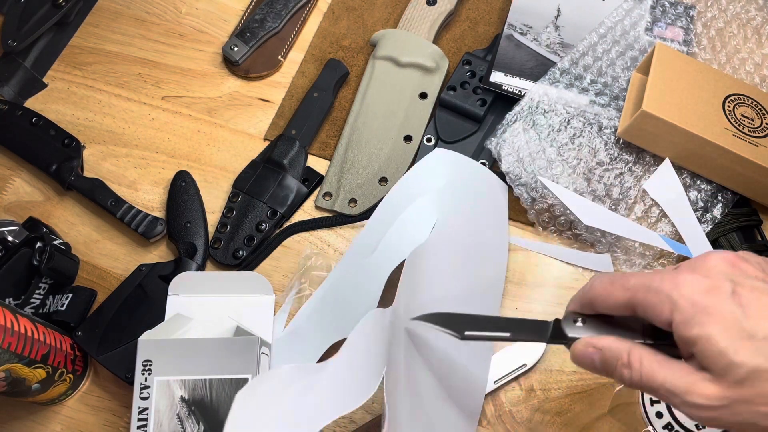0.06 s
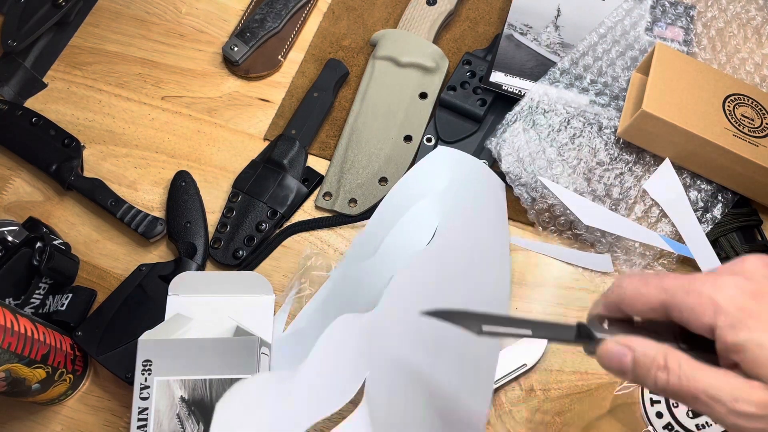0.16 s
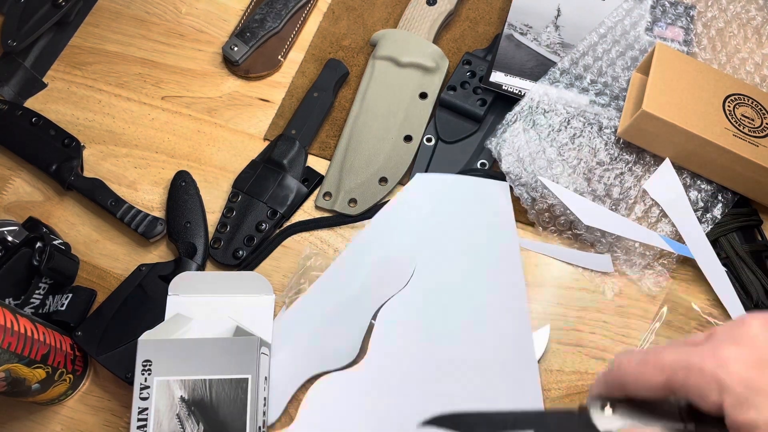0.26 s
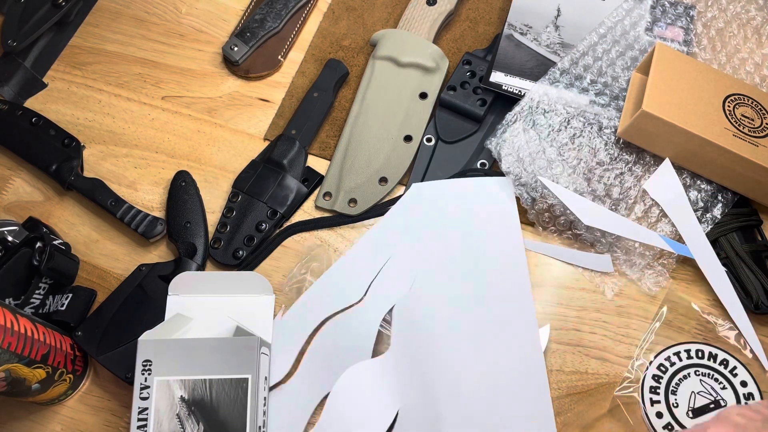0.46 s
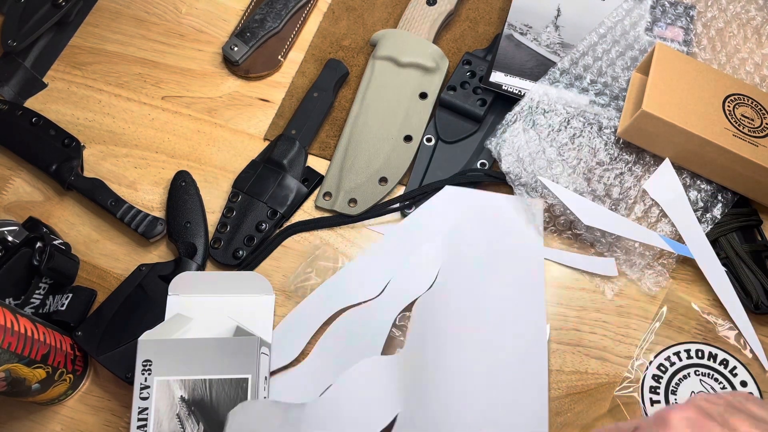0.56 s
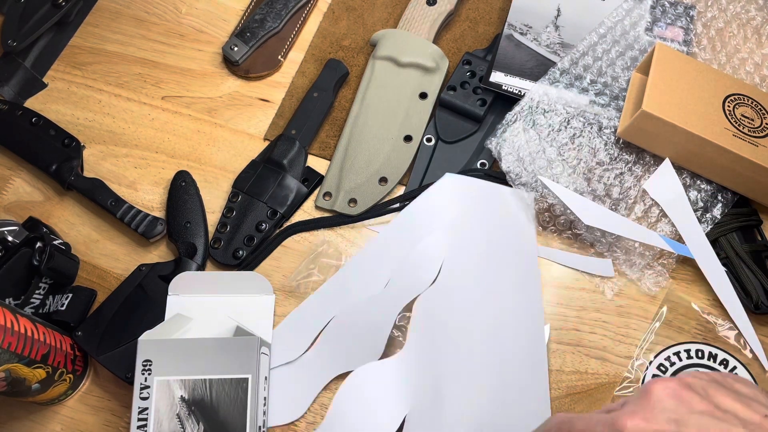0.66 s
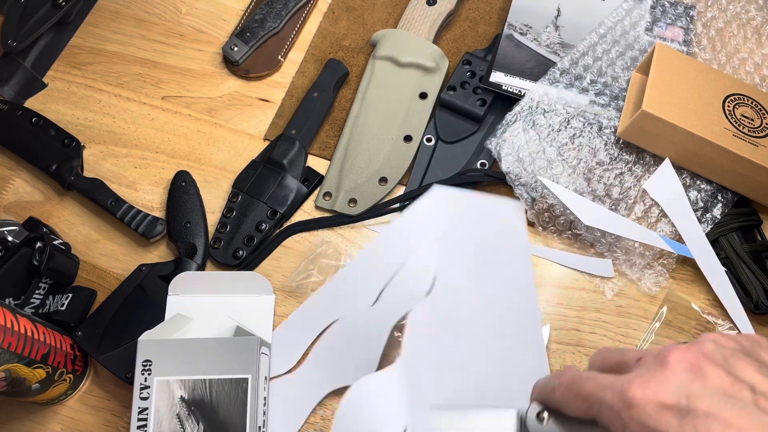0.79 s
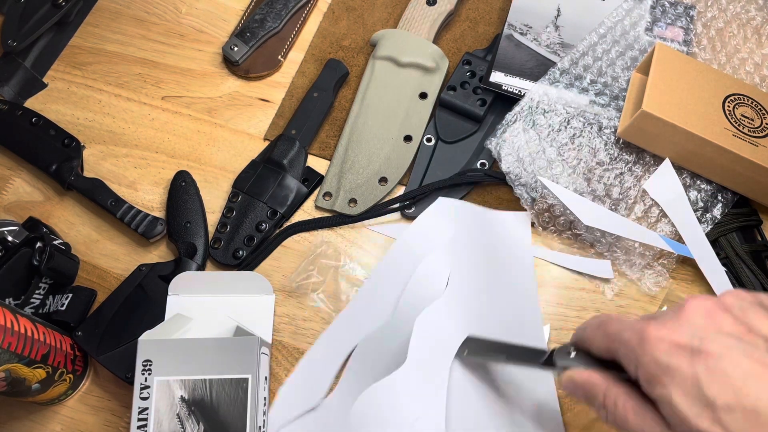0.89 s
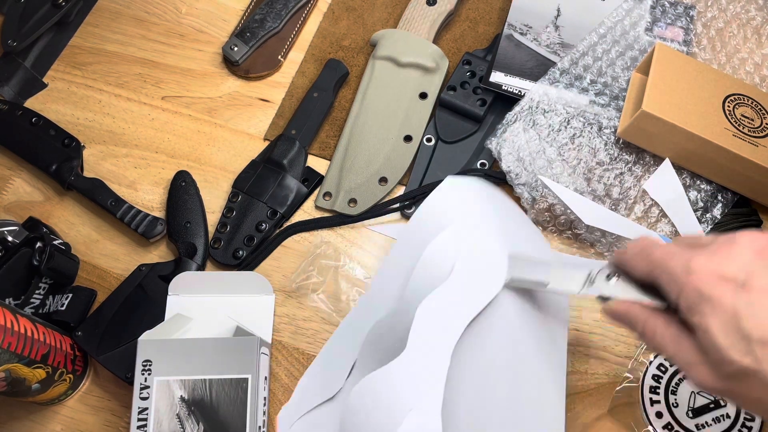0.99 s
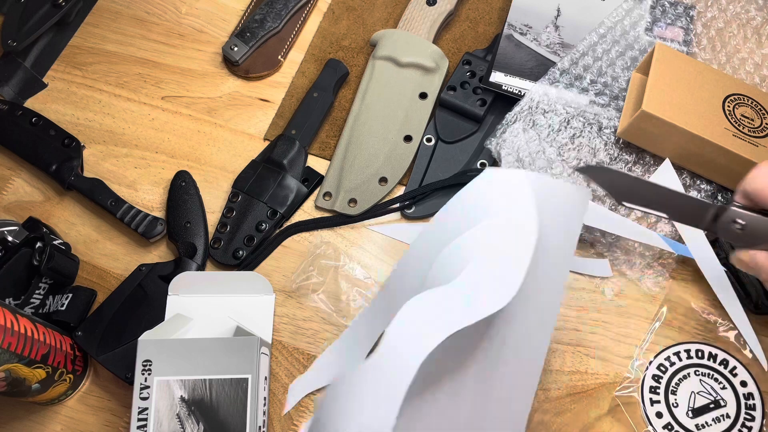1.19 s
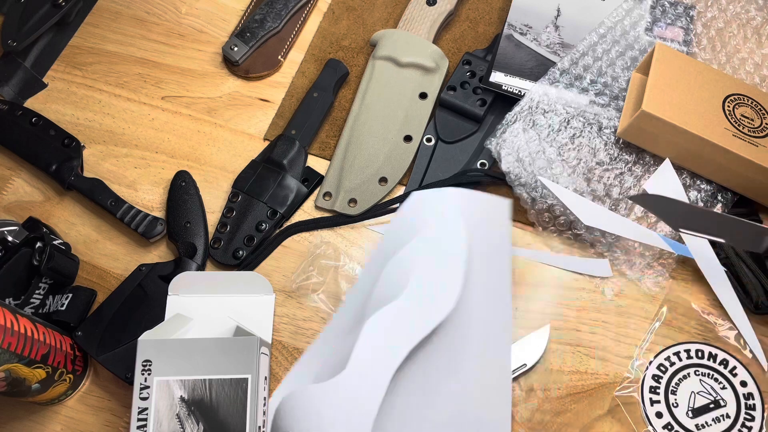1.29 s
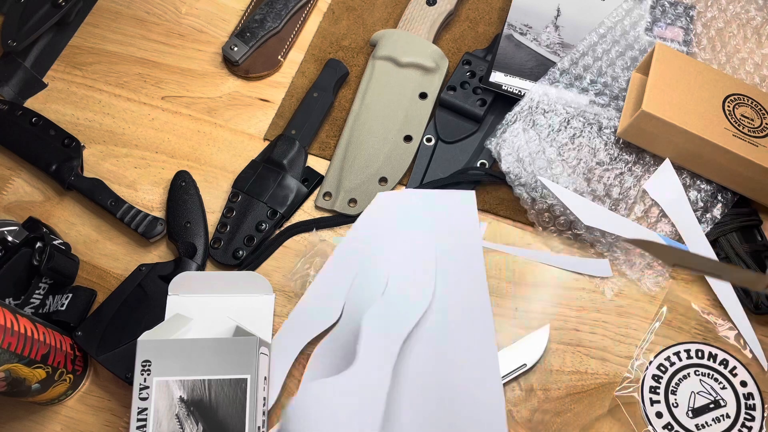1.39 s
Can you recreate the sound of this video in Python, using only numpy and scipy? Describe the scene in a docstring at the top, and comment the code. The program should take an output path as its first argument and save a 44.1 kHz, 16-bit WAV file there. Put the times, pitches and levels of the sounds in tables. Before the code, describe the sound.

A knife blade slices paper twice in crisp, dense hisses, with rustles and pops around the cuts

```python
"""Close to a phone in a quiet room, over a faint steady hush, a hand-held sheet of paper rustles and pops
as it flexes, pushing soft puffs of air at the phone. A pocket knife then slices twice down the sheet:
fibres part as a dense hiss of tiny snaps that the paper radiates. Rustles and pops follow the cuts.
The paper and room are heard in stereo, with a left-right phase offset that depends on pitch."""
import sys
import numpy as np
from scipy import signal
from scipy.fft import rfft, irfft
from scipy.io import wavfile
from scipy.ndimage import uniform_filter1d

SR = 44100
rng = np.random.default_rng(int(sys.argv[2]) if len(sys.argv) > 2 else 0)


def generate_wav(sig):
    """Save sig (samples, or channels by samples) to the path in sys.argv[1] as 16-bit PCM at SR."""
    pcm = np.round(np.clip(np.atleast_2d(sig).T, -1, 1) * 32767).astype(np.int16)
    wavfile.write(sys.argv[1], SR, pcm)


N = 63945  # length in samples, 1.45 s


def undb(db):
    """Decibels to amplitude ratio."""
    return 10 ** (np.asarray(db) / 20)


def unit(x):
    """Scale to an RMS of one."""
    return x / np.sqrt(np.mean(x ** 2))


def peak_one(x):
    """Scale to a peak of one."""
    return x / np.abs(x).max()


def on_log(hz, table):
    """Read a (frequency [Hz], value) table on a log-frequency axis."""
    table_hz, values = np.array(table, float).T
    return np.interp(np.log(np.maximum(hz, 1)), np.log(np.maximum(table_hz, 1)), values)


def colour_by(x, response):
    """Weight the spectrum of a full-length sound by an amplitude response."""
    return irfft(rfft(x) * response, N)


def band(x, hz, width):
    """Band-pass around hz, with a width relative to it."""
    edges = np.clip([hz / (1 + width / 2), hz * (1 + width / 2)], 10, .45 * SR)
    return signal.sosfilt(signal.butter(2, edges, "band", fs=SR, output="sos"), x)


def walk(rate):
    """Random levels held 1 / rate seconds, then smoothed into slopes, with an RMS of one."""
    hold = max(int(SR / rate), 2)
    steps = rng.standard_normal(4000)[np.arange(N) // hold % 4000]
    return unit(uniform_filter1d(uniform_filter1d(steps, hold), hold))


# Spectrum of the room's hush: (frequency [Hz], relative density [dB])
ROOM_HUSH = [(30, -43), (70, -9.5), (130, -14.5), (300, -19), (700, -24), (2000, -10), (4000, -19),
             (6000, -14), (8000, -19.5), (11000, -28), (15000, -29)]
ROOM_HUSH_DB = -64


def room_tone():
    """Faint steady hush of the room: noise with a fixed colour."""
    hz = np.fft.rfftfreq(N, 1 / SR)
    hush = colour_by(rng.standard_normal(N), undb(on_log(hz, ROOM_HUSH)))
    return unit(hush) * undb(ROOM_HUSH_DB)


LARGEST_SNAP = 4.5  # in spreads


def fibres(per_s, spread_db, share):
    """One-sided snaps of uneven size over a bed of fine noise; share is the snaps' part of the power."""
    hit = rng.random(N) < per_s / SR
    size = np.minimum(rng.exponential(size=N), LARGEST_SNAP)
    snaps = unit(hit * undb(spread_db * size))
    bed = rng.standard_normal(N)
    return np.sqrt(share) * snaps + np.sqrt(1 - share) * bed


# Resonances of the sheet: (frequency [Hz], width [Hz], gain [dB])
SHEET_RESONANCES = [(1320, 307, 4), (4510, 120, -1), (5530, 600, 5.5)]
# Where each level column of the handling and cutting tables rules
BASS_HZ, BODY_HZ, RING_HZ, HISS_HZ = 120, 1200, 2100, 3000
TOP_HISS_HZ, SIZZLE_HZ, TREBLE_HZ = 6500, 7200, 9500
HISS_DB, BODY_DB, RING_DB, TREBLE_DB = 1, 5.5, 9, 6.5  # added to those columns
BRIGHT_DB, BRIGHT_OCTAVES = 5, 0.3  # lift of the brightest band
RING_OCTAVES, RING_WANDER_OCTAVES, RING_WANDER_PER_S = .28, .07, 14  # the ring drifts as the sheet bends
JUDDER_DB, JUDDER_PER_S = 1.5, 150  # level wander shared by all bands
FLICKER_DB, FLICKER_PER_S = 2.2, 45  # level wander of each band alone
TOGETHER = 0.41  # power share of the snaps that sound in all bands at once


def sheet(spans, colour, snaps):
    """Snaps ring in overlapping third-octave bands of the sheet; each region follows its level."""
    t, freq = np.arange(N) / SR, np.fft.rfftfreq(N, 1 / SR)
    peaks_db = sum(db / (1 + (2 * (freq - hz) / width) ** 2) for hz, width, db in SHEET_RESONANCES)
    radiation = undb(on_log(freq, colour) + peaks_db)
    judder = undb(JUDDER_DB * walk(JUDDER_PER_S))
    shared_snaps = fibres(*snaps)

    # silent outside the spans: level, body, treble, ring, brightest band, sizzle
    now = np.array([np.full(N, -120.), *np.zeros((3, N)), np.full(N, HISS_HZ), np.zeros(N)])
    for rows in spans:
        s, *cols = np.array(rows, float).T
        on = (t >= s[0]) & (t <= s[-1])
        now[:len(cols), on] = [np.interp(t[on], s, c) for c in cols]
    level, body, treble, ring, bright_hz, sizzle = now
    ring_hz = RING_HZ * 2 ** (RING_WANDER_OCTAVES * walk(RING_WANDER_PER_S))

    out = np.zeros(N)
    for hz in 50 * 2 ** (np.arange(26) / 3):
        # triangle reaching to the neighbouring bands
        band_shape = np.clip(1 - 3 * np.abs(np.log2(np.maximum(freq, 1) / hz)), 0, 1)
        low = on_log(hz, [(BASS_HZ, 0), (3 * BASS_HZ, 1), (BODY_HZ, 1), (RING_HZ, 0)])
        mid = np.exp(-(np.log2(hz / ring_hz) / RING_OCTAVES) ** 2)
        bright = np.exp(-(np.log2(hz / bright_hz) / BRIGHT_OCTAVES) ** 2)
        edge = np.exp(-(3 * np.log2(hz / SIZZLE_HZ)) ** 2)
        high = on_log(hz, [(TOP_HISS_HZ, 0), (TREBLE_HZ, 1)])
        db = level + HISS_DB + FLICKER_DB * walk(FLICKER_PER_S)
        db = db + low * (body + BODY_DB) + mid * (ring + RING_DB) + high * (treble + TREBLE_DB)
        db = db + BRIGHT_DB * bright + edge * sizzle
        drive = judder * (np.sqrt(TOGETHER) * shared_snaps + np.sqrt(1 - TOGETHER) * fibres(*snaps))
        out = out + undb(db) * colour_by(drive, radiation * band_shape)
    return out


# Handling close to the phone, one list before the cuts and one after: (time [s], hiss level [dB],
# body re hiss [dB], treble re hiss [dB], ring re hiss [dB], brightest band [Hz])
HANDLING = [
    [(0.115, -49, 9.5, -20, 19, 3130), (0.151, -43.5, -4.5, -4.5, -31, 5830),
     (0.207, -45.5, 0.5, -11.5, 4.5, 4100), (0.245, -58.5, 24, -2, 30.5, 4860),
     (0.253, -36.5, 6.5, -33, 24.5, 5100), (0.275, -62.5, 27.5, -6, 23.5, 4950),
     (0.295, -46.5, 8.5, -2, 10, 4310), (0.317, -60.5, 17.5, -15, 16, 3430),
     (0.355, -48.5, 2.5, -15, 6, 3020), (0.401, -53.5, 4.5, -4, 3, 3380), (0.451, -58.5, -8, -12, 14, 3430),
     (0.455, -48, 8, -8, 4, 3410)],
    [(1.19, -51, 9, 1, -4, 3670), (1.218, -47, 12, -19, 3, 4530), (1.234, -46, 2, -2, -35, 4950),
     (1.25, -41, -16, -5, 6.5, 5060), (1.266, -51, 7, -8, -28, 5070), (1.288, -45.5, -5, -11, 0, 5000),
     (1.348, -46.5, 1, -12, 3, 4250), (1.368, -43.5, -14, -11, 0, 4430), (1.386, -48, 2, -4, 3, 4200),
     (1.4, -45.5, 2, -15, -1, 3540), (1.412, -47, -2.5, -15, 5, 3700), (1.45, -37, -7.5, -9, 2, 4280)],
]
# What the handled sheet radiates: (frequency [Hz], relative density [dB])
HANDLING_COLOUR = [(60, -31), (130, -32), (250, -4.5), (500, -14), (900, -6.5), (2100, -8.5), (3200, -2),
                   (5500, -8), (7500, 4), (10000, -7), (15500, -11)]
CRACKLES_PER_S, CRACKLE_SPREAD_DB, CRACKLE_SHARE = 1300, 4.5, 0.49


def rustles():
    """The handled sheet crackles: sparse snaps of very uneven size, radiated by the paper."""
    return sheet(HANDLING, HANDLING_COLOUR, (CRACKLES_PER_S, CRACKLE_SPREAD_DB, CRACKLE_SHARE))


# Pops of the sheet, from buckling as it flexes and, late in the second cut, from the knife sticking and
# slipping: (time [s], ring peak [dB], ring [Hz], ring t60 [s], crack re ring [dB])
SHEET_POPS = [(0.115, -42, 1450, 0.029, 3), (0.143, -45, 2130, 0.023, -11), (0.17, -39.5, 2170, 0.017, -9),
              (0.217, -28.5, 975, 0.019, -12), (0.221, -36.5, 1030, 0.014, 5),
              (0.244, -26.5, 1244, 0.025, -20), (0.254, -19.5, 1258, 0.038, -11),
              (0.254, -35.5, 566, 0.025, -20), (0.261, -35, 1450, 0.022, -12),
              (0.458, -31.5, 2265, 0.035, -17), (0.46, -31.5, 1280, 0.035, -13),
              (0.463, -32, 878, 0.061, -5.5), (0.474, -36, 890, 0.027, -12), (0.507, -44, 2020, 0.065, -18),
              (0.535, -14, 1420, 0.01, -15), (0.557, -23, 2060, 0.025, 2), (1.047, -23, 2030, 0.026, 4),
              (1.133, -24, 2500, 0.021, -14), (1.144, -31, 2960, 0.025, -5), (1.155, -29, 2700, 0.018, -5),
              (1.163, -29.5, 3150, 0.014, 5), (1.178, -29, 2210, 0.023, -25), (1.202, -47, 407, 0.022, 7),
              (1.2217, -33, 1110, 0.042, 1.5), (1.225, -41, 543, 0.037, -22), (1.233, -39, 1080, 0.035, -16),
              (1.248, -50, 2660, 0.015, 4), (1.291, -41.5, 4960, 0.022, 0), (1.296, -37.5, 1250, 0.0075, -1),
              (1.296, -51.5, 340, 0.05, -25), (1.32, -41, 2350, 0.018, -14), (1.36, -41.5, 2700, 0.021, 1),
              (1.366, -42, 3530, 0.015, 5), (1.38, -43, 2370, 0.024, 6), (1.393, -38.5, 2160, 0.041, -2),
              (1.402, -34.5, 2680, 0.0075, -6)]
POP_WIDTH, POP_RISE_S = 0.61, 0.0008
POP_CLEAN = .5  # share of each pop that rings as one clear mode
CRACK_HZ, CRACK_WIDTH, CRACK_T60_S = 3470, 0.95, 0.011


def pops():
    """Each pop swells fast and rings the sheet, part clear mode and part rattle, with a crack on top."""
    out, t = np.zeros(N), np.arange(int(.1 * SR)) / SR
    rise = 1 - np.exp(-(t / POP_RISE_S) ** 2)
    for s, db, hz, t60, crack_db in SHEET_POPS:
        rattle = rng.standard_normal(len(t)) * rise
        fade = undb(-60 * t / max(t60, .003))
        mode = rise * fade * np.sin(2 * np.pi * (hz * t + rng.random()))
        noisy_ring = band(rattle * fade, hz, POP_WIDTH)
        ring = POP_CLEAN * peak_one(mode) + (1 - POP_CLEAN) * peak_one(noisy_ring)
        crack = band(rattle * undb(-60 * t / CRACK_T60_S), CRACK_HZ, CRACK_WIDTH)
        pop = undb(db) * (peak_one(ring) + undb(crack_db) * peak_one(crack))
        i = int((s - POP_RISE_S) * SR)
        out[i:i + len(t)] += pop[:N - i]
    return out


# Air the swinging sheet pushes at the phone: (time [s], peak [dB], centre [Hz], length [s])
AIR_PUSHES = [(0.15, -59, 80, 0.12), (0.215, -49.5, 165, 0.021), (0.269, -51.5, 117, 0.05),
              (0.336, -53.5, 209, 0.056), (0.484, -62.5, 63.5, 0.047), (1.165, -51.5, 202, 0.048),
              (.8, -63, 65, 0.049), (0.801, -51, 133, 0.028), (0.984, -59, 123, 0.1),
              (0.237, -59, 55, 0.037), (1.17, -58, 76, 0.026)]
PUFF_WIDTH = 0.39


def puffs():
    """Soft low swells of rumbling air: narrow-band noise under a bell-shaped envelope."""
    t, out = np.arange(N) / SR, np.zeros(N)
    for s, db, hz, length in AIR_PUSHES:
        swell = np.exp(-(2 * (t - s) / length) ** 2)
        rumble = band(rng.standard_normal(N), hz, PUFF_WIDTH)
        out += undb(db) * peak_one(swell * rumble)
    return out


# The two slices, close to the phone: (time [s], hiss level [dB], body re hiss [dB], treble re hiss [dB],
# ring near 2 kHz re hiss [dB], brightest band [Hz], lift of the sizzle near 7 kHz [dB])
SLICES = [
    [(0.457, -57, -11, 2, -1, 3680, -11), (0.465, -52.5, -7, -10, 11, 3550, -12),
     (0.479, -42.5, -3.5, -6.5, 3, 3720, -7), (0.513, -35.5, -6.5, -15, -3, 3770, -7.5),
     (0.539, -35.5, -0.5, -16, 1, 4000, 0), (0.553, -35, -2.5, -0.5, 11.5, 3700, -11),
     (0.583, -31, -1.5, -8.5, -5, 3500, -17), (0.609, -36.5, -1.5, -6.5, 3.5, 3930, 0.5),
     (0.651, -39.5, 6, -1, -1, 5300, -5.5), (0.711, -33.5, -1, -10, -8.5, 5730, -2.5),
     (0.732, -41.5, -1, -11, -3, 5000, -18)],
    [(0.733, -41, -8, 2, -8, 5430, -12), (0.745, -28, -4.5, -12.5, -8, 5500, 0),
     (0.769, -29, -7.5, -4, -4, 5950, -3), (0.783, -30.5, 1, -13, -6, 5400, -3),
     (0.831, -28, -10.5, -5.5, -1, 3600, 2.3), (0.881, -35.5, -3, -1.5, -3, 4300, 1.5),
     (0.929, -34, -7, -4, -3, 5130, -11), (0.985, -30, -4.5, -8.5, -10, 4300, -10),
     (1.003, -30.5, -3, -7, -12, 4420, -1.5), (1.105, -30.5, -10, -10.5, -9.5, 4800, -5.2),
     (1.131, -38.5, -5.5, -10, -10, 4420, -4), (1.151, -35.5, -13.5, -5, -29, 4100, -8.5),
     (1.165, -42, 5.5, -8, -17, 3700, -1), (1.183, -50, 7, -8, 15, 3460, 5),
     (1.215, -57, 5, -13, -3, 3480, -8)],
]
# What the sheet radiates under the knife: (frequency [Hz], relative density [dB])
SLICE_COLOUR = [(60, -21), (130, -14), (250, -4), (370, -2.5), (500, -5), (900, 6), (1400, 3.5),
                (2100, 6.5), (3000, 6), (4200, 5.5), (5500, 2), (7500, 12.5), (10000, 0), (13000, -4.5),
                (15500, -1.5)]
SNAPS_PER_S, SNAP_SPREAD_DB, SNAP_SHARE = 2500, 1.5, 0.45


def cuts():
    """The knife parts the fibres: dense snaps of fairly even size, radiated by the paper."""
    return sheet(SLICES, SLICE_COLOUR, (SNAPS_PER_S, SNAP_SPREAD_DB, SNAP_SHARE))


ROOM_T60_S, ROOM_DB = 0.12, -16


def echo(x, db):
    """A short diffuse tail from tabletop and walls: decaying noise that starts after 3 ms."""
    t = np.arange(int(.4 * SR)) / SR
    tail = rng.standard_normal(len(t)) * undb(-60 * t / ROOM_T60_S) * (t > .003)
    return undb(db) * signal.fftconvolve(x, tail / np.sqrt(np.sum(tail ** 2)))[:N]


# Unrelated diffuse sound in left and right, by pitch: (frequency [Hz], level [dB])
DIFFUSE_LEVEL = [(100, -17), (300, -5), (600, -2), (1300, -16.5), (2600, -9), (5500, -8), (7000, -67),
                 (8200, -66), (11000, 0), (13500, -14)]


def diffuse_stereo(x):
    """Two independent tails, left and right, coloured alike and almost absent near 7-8 kHz."""
    tilt = undb(on_log(np.fft.rfftfreq(N, 1 / SR), DIFFUSE_LEVEL))
    return colour_by([echo(x, 0), echo(x, 0)], tilt)


# Left-right phase offset by pitch: (frequency [Hz], left minus right [rad])
PHASE_OFFSET = [(0, 0), (150, 0), (520, -.4), (1200, -.3), (1650, 0), (2200, .6), (3300, .6), (3900, .45),
                (4500, .8), (5200, 0), (5600, .5), (6200, 1.2), (6900, 3.1), (8300, 3.2), (9700, 5.5),
                (10300, 6.2), (11700, 6.35), (12400, 7.2), (13300, 9.4), (15100, 9.4), (15600, 10.1)]
# Left-right level tilt by pitch: (frequency [Hz], left minus right [dB])
LEVEL_TILT = [(60, 0), (110, .5), (200, 3.5), (380, 6), (700, 3.5), (1290, 1.8), (2380, .7), (4400, .3),
              (8000, 0)]


def stereo(x):
    """The same sound in both channels, with a phase offset and level tilt that depend on pitch."""
    hz = np.fft.rfftfreq(2 * N, 1 / SR)  # padded, so that shifts do not wrap around
    offset_hz, offset = np.array(PHASE_OFFSET, float).T
    # each channel takes half of the difference, in opposite senses
    left = undb(on_log(hz, LEVEL_TILT) / 2) * np.exp(.5j * np.interp(hz, offset_hz, offset))
    return np.array([irfft(rfft(x, 2 * N) * h, 2 * N)[:N] for h in (left, 1 / left)])


def scene():
    """Paper, its echo and the room are spread in stereo; the puffs are alike in both channels."""
    paper = cuts() + rustles() + pops()
    diffuse = diffuse_stereo(paper)
    shared = paper + echo(paper, ROOM_DB) + room_tone()
    return stereo(shared) + diffuse + puffs()


TOP_HZ = 15800


def record(dry):
    """The phone cuts the top with a steep low-pass."""
    return signal.sosfilt(signal.ellip(16, .3, 80, TOP_HZ, fs=SR, output="sos"), dry)


dry = scene()
out = record(dry)
generate_wav(out)
```